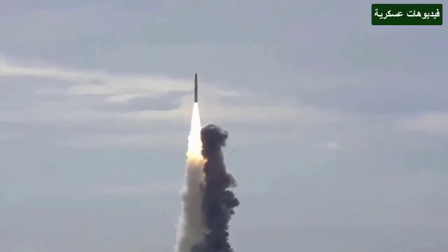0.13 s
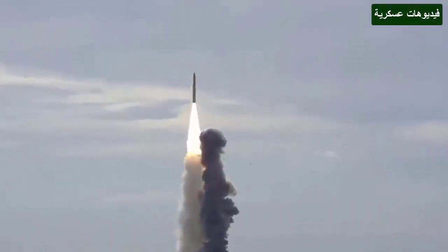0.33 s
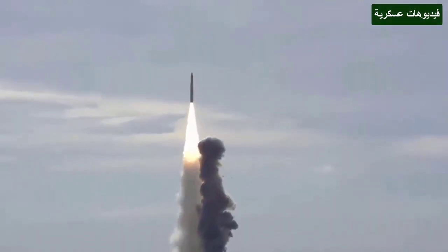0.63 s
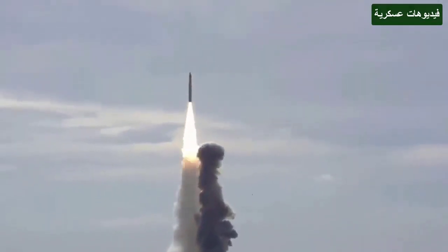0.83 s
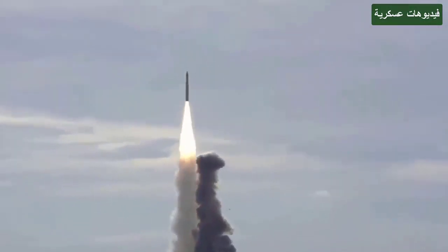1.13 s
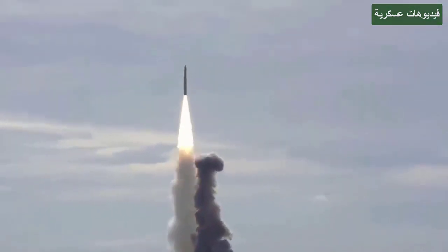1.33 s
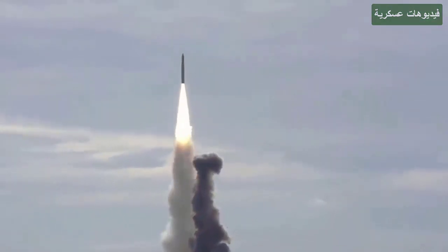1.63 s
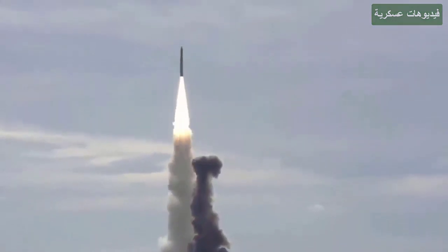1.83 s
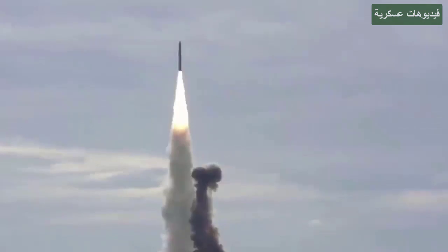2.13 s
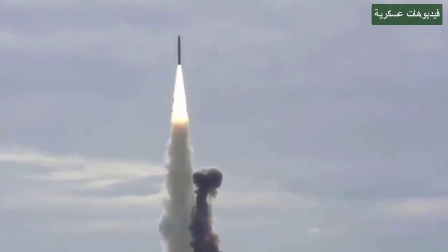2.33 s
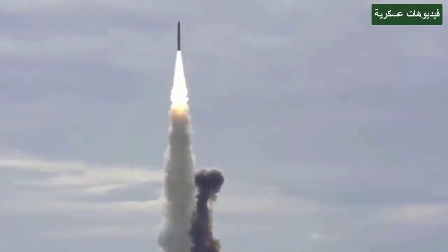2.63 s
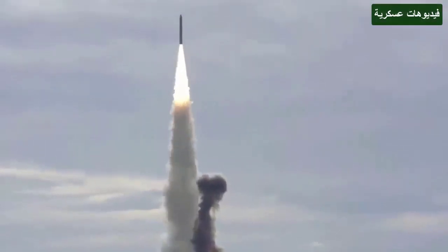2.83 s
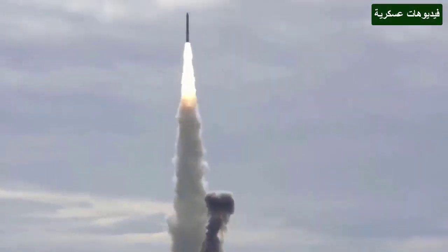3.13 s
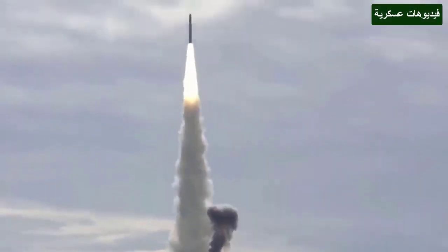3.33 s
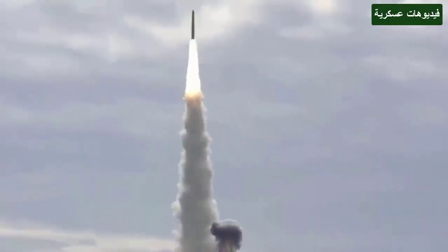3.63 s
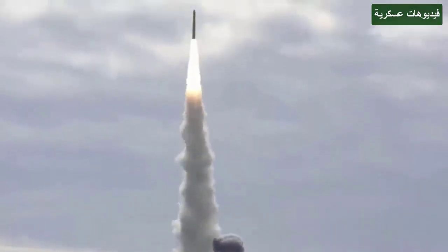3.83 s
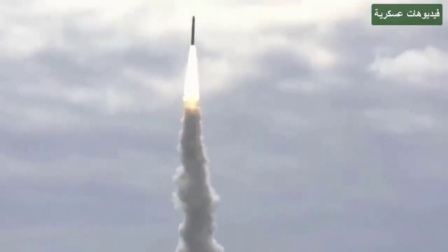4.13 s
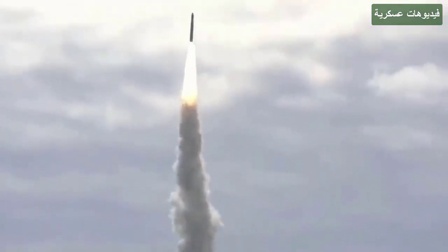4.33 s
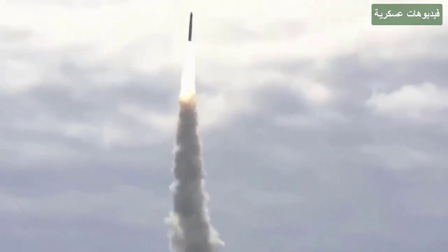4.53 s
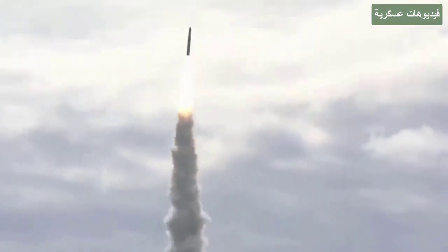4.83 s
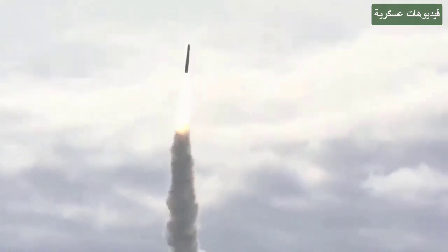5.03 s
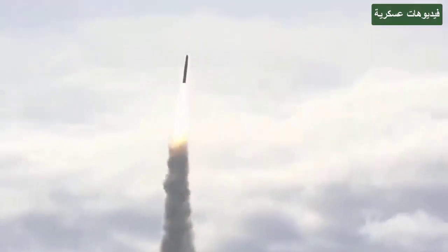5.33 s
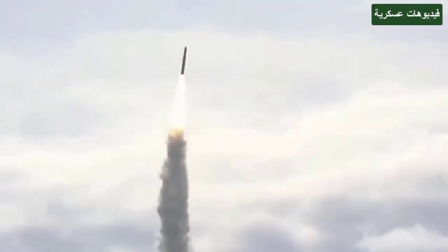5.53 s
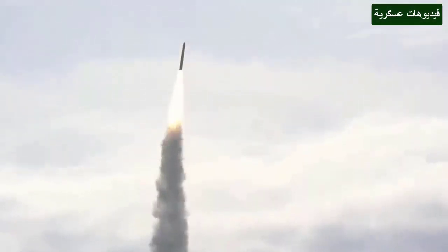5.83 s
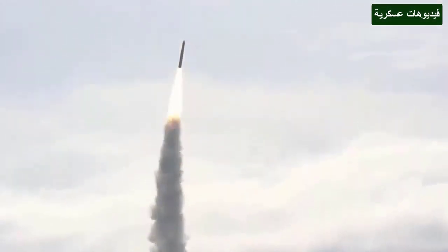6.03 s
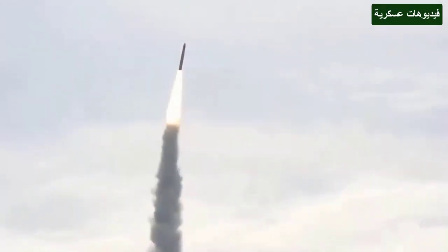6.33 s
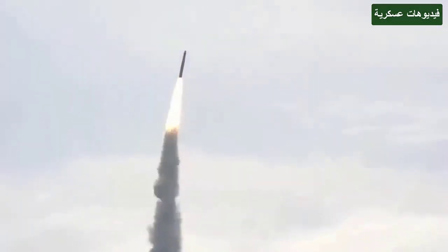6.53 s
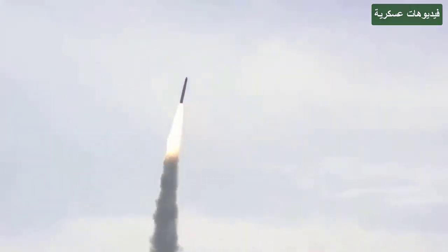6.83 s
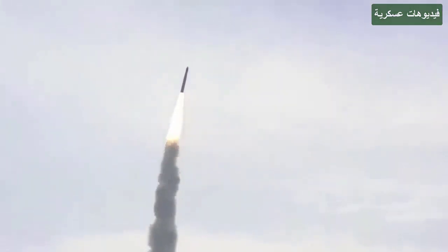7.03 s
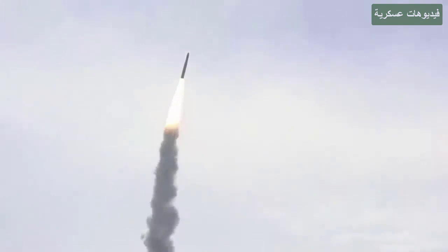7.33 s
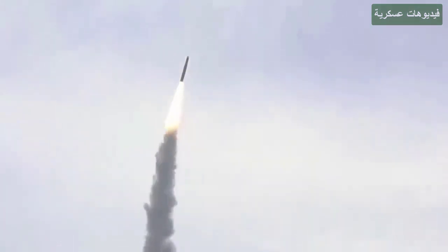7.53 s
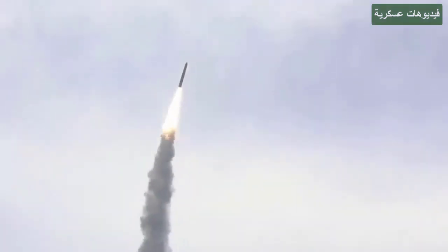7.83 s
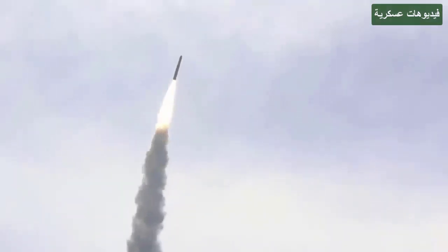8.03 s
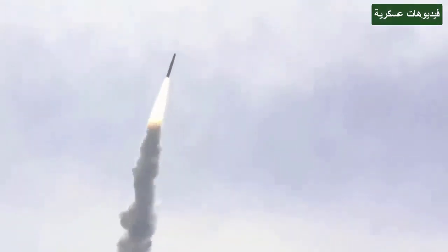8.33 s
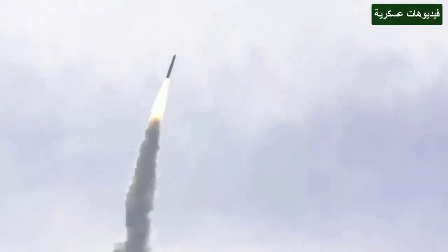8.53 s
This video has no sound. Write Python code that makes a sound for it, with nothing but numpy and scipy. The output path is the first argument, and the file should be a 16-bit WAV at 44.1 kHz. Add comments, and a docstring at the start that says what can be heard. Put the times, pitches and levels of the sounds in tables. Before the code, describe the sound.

Windy ship deck with whining machinery, a booming gas ejection, a short rasping jet burst, then a rocket motor ignites into an overloaded, crackling roar.

```python
"""Wind and whining machinery are heard on a ship's deck, then a rocket is launched: gas booms out of its tube.
A half-second jet burst follows, and then the main motor lights at once.
Its roar overloads the microphone; its crackle swells to a peak about three seconds after ignition, then eases.
Filtered noise makes wind, gas and plume; sines and narrow resonances make the notes; clicks make shocks."""
import sys
import numpy as np
from scipy import signal
from scipy.fft import rfft, irfft, next_fast_len
from scipy.io import wavfile
from scipy.ndimage import uniform_filter1d, map_coordinates

SR = 44100
rng = np.random.default_rng(int(sys.argv[2]) if len(sys.argv) > 2 else 0)


def generate_wav(sig):
    """Save sig (samples, or channels by samples) to the path in sys.argv[1] as 16-bit PCM at SR."""
    pcm = np.round(np.clip(np.atleast_2d(sig).T, -1, 1) * 32767).astype(np.int16)
    wavfile.write(sys.argv[1], SR, pcm)


N = 382347
TIME = np.arange(N) / SR  # seconds
SIDES = np.array([[1], [-1]])  # opposite signs for the left and right ear
IGNITION_S = 4.073  # the main motor lights

# In every spectrum below, level_db is relative: the filtered noise is scaled afterwards.
# spectrum of rushing gas: pitch_hz [Hz], level_db [dB per Hz]
GAS_SPECTRUM = [(120, -18.5), (220, -2), (330, 4), (520, -3), (630, -6), (780, -0.5), (1100, -7),
                (1400, -9.5), (2100, -19.5), (3000, -35), (4200, -49), (8000, -64)]
# spectrum of the rasp on the edge of the escaping gas: pitch_hz [Hz], level_db [dB per Hz]
RASP_SPECTRUM = [(900, -9.5), (1500, 0.5), (2200, -8), (2900, -12.5), (3600, -21.5), (5000, -33)]


def undb(db):
    """Turn decibels into gain."""
    return 10 ** (np.asarray(db) / 20)


def unit(x):
    """Scale a sound to an average (rms) strength of 1."""
    return x / np.sqrt(np.mean(x ** 2))


def curves(table):
    """Draw each column of a table as a curve over time, one value per sample."""
    s, *columns = np.transpose(table)
    return [np.interp(TIME, s, column) for column in columns]


def since(s):
    """Seconds since a moment, zero before it."""
    return np.maximum(TIME - s, 0)


def fade(s, decay_s):
    """Start at once and die away."""
    return (TIME > s) * np.exp(-since(s) / decay_s)


def puff(s, swell_s):
    """Swell to 1 in the swell time and die away more slowly."""
    age = since(s) / swell_s
    return age * np.exp(1 - age)


def swell(s, half_s):
    """Rise smoothly to 1 at a moment and sink the same way."""
    return np.exp(-((TIME - s) / half_s) ** 2)


def walk(rate):
    """Smooth random wander with spread near 1, taking about `rate` new values a second."""
    knots = rng.standard_normal(8192)
    return map_coordinates(knots, [TIME * rate], order=2, mode="wrap")


def colour(x, points):
    """Filter a sound through (Hz, dB) points without any sound ahead of its cause."""
    size = next_fast_len(N + SR // 2, True)
    hz, db = np.transpose(points)
    f = np.maximum(np.fft.rfftfreq(size, 1 / SR), 1)
    # beyond the first and last point the level falls 12 dB per octave, by 60 dB at most
    slopes = 40 * np.log10(np.minimum(f / hz[0], 1) * np.minimum(hz[-1] / f, 1))
    gain_db = np.interp(np.log(f), np.log(hz), db) + np.maximum(slopes, -60)
    gain = unit(undb(gain_db))
    # folding the cepstrum forward in time gives the filter its minimum phase
    cepstrum = irfft(np.log(gain), size)
    cepstrum[1:size // 2] *= 2
    cepstrum[size // 2 + 1:] = 0
    return irfft(rfft(x, size) * np.exp(rfft(cepstrum)), size)[:N]


def noise(points):
    """Turbulence with a given spectrum, rms 1."""
    return unit(colour(rng.standard_normal(N), points))


def ring(hz, width_hz):
    """A narrow resonance fed by turbulence, rms 1; its centre may move."""
    phase = 2 * np.pi * np.cumsum(hz * np.ones(N)) / SR
    return unit(walk(width_hz) * np.cos(phase) + walk(width_hz) * np.sin(phase))


def shocks(wave, per_s, spread_db):
    """Shock fronts of widely varying size, most likely on the falling flanks of a wave; rms 1."""
    flank = np.maximum(-np.gradient(uniform_filter1d(wave, size=12)), 0)
    struck = rng.random(N) < flank / flank.mean() * per_s / SR
    size = undb(spread_db * np.minimum(rng.exponential(size=N), 4))
    return -unit(struck * size / np.sqrt(per_s))


def fizzed(clicks, fizz, decay_s, points):
    """Scatter every shock into a very short fizz, whose treble differs at each ear."""
    decay = np.exp(-1 / (decay_s * SR))
    tail = np.sqrt(signal.lfilter([1 - decay], [1, -decay], clicks ** 2))
    mid = colour(clicks + fizz * tail * rng.standard_normal(N), points)
    side = colour(.55 * tail * rng.standard_normal(N), points)
    treble_only = signal.butter(2, 4300, "high", fs=SR, output="sos")
    return mid + SIDES * signal.sosfilt(treble_only, side)


def gusty_wind():
    """Turbulent air buffets the microphone: low noise with a wandering level and a few strong gusts."""
    # wind at the microphone: pitch_hz [Hz], level_db [dB per Hz]
    wind_spectrum = [(8, 2.5), (20, -0.5), (57, -4), (67, -13.5), (90, -18), (150, -22.5), (210, -28.5),
                     (400, -38), (900, -80.5)]
    # the strongest gusts: peak_s [s], level_db [dB above the steady wind]
    strong_gusts = [(1.19, 6.5), (1.36, 5), (2.05, 4), (2.42, 3)]
    steady_db, gust_half_s, buffet_db = -29, 0.071, 1.5
    gust_db = sum(db * swell(s, gust_half_s) for s, db in strong_gusts)
    buffeted = noise(wind_spectrum) * undb(buffet_db * walk(9.4))
    return unit(buffeted) * undb(steady_db + gust_db)


def engine_drone():
    """The ship's engines drone: one narrow, low resonance."""
    return undb(-47.5) * ring(146.2, width_hz=20)


def whine(hz, width_hz):
    """A steady line inside a skirt of noise; the wider the line, the rougher."""
    rough_width_hz = 48  # here line and skirt have comparable strength
    skirt = (width_hz / rough_width_hz) ** 2 * ring(hz, width_hz)
    return unit(np.sin(2 * np.pi * hz * TIME) + skirt)


def whistles():
    """Turbines whistle on thin, close lines, each drifting with its own speed."""
    # turbine whistles: pitch_hz [Hz], level_db [dB against the machinery level]
    whistle_lines = [(5295, -14.5), (5585, -14.5), (5628, -11.5), (5700, -12)]
    # upper partials they share: multiple [times the pitch], level_db [dB against the main line]
    whistle_partials = [(1.25, -9), (1.5, -13.5)]
    drift = 0.0027  # share of the pitch
    out = 0
    for hz, db in whistle_lines:
        drifting_hz = hz * (1 + drift * walk(1.6))
        phase = 2 * np.pi * np.cumsum(drifting_hz) / SR
        upper = sum(undb(upper_db) * np.sin(multiple * phase) for multiple, upper_db in whistle_partials)
        out = out + undb(db) * unit((np.sin(phase) + upper) * undb(1.6 * walk(11)))
    return out


def dip_under(loud):
    """Gain of a background that dips under a loud sound and creeps back."""
    threshold_db, depth, smooth_s = -46, 0.19, 0.058
    keep = np.exp(-1 / (smooth_s * SR))
    power = signal.lfilter([1 - keep], [1, -keep], loud ** 2)
    return (1 + power / undb(threshold_db) ** 2) ** -depth


def machinery(launch):
    """Machinery hisses as broad noise and whines on steady lines, dipping under the launch."""
    # machinery hiss: pitch_hz [Hz], level_db [dB per Hz]
    hiss_spectrum = [(90, 7), (150, 8), (210, -3), (400, -2), (900, -3.5), (1400, -7.5), (2000, -13),
                     (3500, -20.5), (6000, -24), (8800, -29.5), (10000, -38), (15000, -45.5)]
    # machinery whine: pitch_hz [Hz], width_hz [Hz], level_db [dB against the machinery level]
    whine_lines = [(915, 9.7, 3.5), (1404, 25, -1), (1755, 37, -6), (2270, 35, -11.5), (2760, 60, -13.5)]
    machinery_db, hiss_db = -58, 14  # the hiss is set against the machinery level
    lowest, *upper = [undb(db) * whine(hz, width_hz) for hz, width_hz, db in whine_lines]
    # the lowest whine fades for a while around the boom
    lull = undb(-9 * swell(1.7, half_s=0.48))
    lines = lowest * lull + sum(upper) + whistles()
    return (undb(hiss_db) * noise(hiss_spectrum) + lines) * undb(machinery_db) * dip_under(launch)


def deck(launch):
    """Wind, drone and machinery together, fading out within hundredths of a second of ignition."""
    background = gusty_wind() + engine_drone() + machinery(launch)
    return background * np.exp(-since(IGNITION_S) / 0.0078)


def gas_rush():
    """Hollow swells of rushing gas around the launch, each a resonance with a wandering pitch."""
    # swells: peak_s [s], level_db [dB], half_length_s [s], pitch_hz [Hz], width_hz [Hz]
    rush_swells = [(0.728, -48, 0.062, 578, 100), (1.327, -42, 0.19, 691, 421),
                   (1.442, -42.5, 0.067, 717, 130.7), (1.602, -30, 0.042, 617, 461.6),
                   (1.827, -45, 0.19, 640, 456.5), (1.897, -44.5, .06, 560, 48.8),
                   (3.683, -52.5, 0.46, 694, 461)]
    wander = .05  # share of the pitch
    out = np.zeros(N)
    for s, db, half_s, hz, width_hz in rush_swells:
        out += undb(db) * swell(s, half_s) * ring(hz * (1 + wander * walk(9)), width_hz)
    return out


def ejection():
    """Gas rushes from the tube, bursts out with a snap in lumpy, rasping puffs and rolls away."""
    # low body of the boom: pitch_hz [Hz], level_db [dB per Hz]
    boom_spectrum = [(20, 3.5), (60, -12.5), (85, 3.5), (115, 0.5), (200, -1), (300, -11.5), (420, -12),
                     (900, -31)]
    # the snap of the opening tube: pitch_hz [Hz], level_db [dB per Hz]
    snap_spectrum = [(400, 8), (1500, -17), (3000, 22), (5000, 10), (8000, 3), (15500, -17)]
    # puffs of gas that make up the boom: start_s [s], low_db [dB], bright_db [dB], swell_s [s]
    gas_puffs = [(1.523, -16.5, -25, 0.0046), (1.544, -17, -30.5, 0.014), (1.577, -26, -31, 0.02),
                 (1.64, -29, -42, 0.029), (1.711, -28.5, -41, 0.011)]
    rasp_db, lumps_db = -12, 1.0
    boom_s = gas_puffs[0][0]
    # the boom rolls away over the water, its bright part dying first
    low = undb(-34.5) * fade(boom_s, decay_s=1)
    bright = undb(-44.5) * fade(boom_s, decay_s=0.53)
    for s, low_db, bright_db, swell_s in gas_puffs:
        low = np.hypot(low, undb(low_db) * puff(s, swell_s))
        bright = np.hypot(bright, undb(bright_db) * puff(s, swell_s))
    rasping = noise(GAS_SPECTRUM) + undb(rasp_db) * noise(RASP_SPECTRUM)
    gas = unit(rasping * undb(lumps_db * walk(180)))
    snap = undb(-35) * fade(boom_s, decay_s=0.0026) * noise(snap_spectrum)
    # a low throb comes late in the boom
    throb_hz = 93.5
    throb = undb(-25) * swell(1.73, half_s=0.03) * np.sin(2 * np.pi * throb_hz * TIME)
    return gas_rush() + snap + throb + low * noise(boom_spectrum) + bright * gas


def jet_howl():
    """The jet's resonances howl together on a wandering note."""
    # the howl: time_s [s], pitch_hz [Hz], level_db [dB]
    howl_path = [(2.46, 337.8, -31), (2.51, 264, -35), (2.56, 329.3, -32), (2.61, 351.3, -41),
                 (2.63, 353, -27), (2.71, 309.7, -29), (2.77, 311, -31), (2.83, 386.3, -38),
                 (2.9, 291.6, -49), (2.95, 268, -35.5)]
    # upper resonances: multiple [times the note], width_hz [Hz], level_db [dB against the note]
    howl_resonances = [(1.5, 129.8, -6.5), (2.35, 90.2, -15.5)]
    howl_hz, howl_db = curves(howl_path)
    howl = ring(howl_hz, width_hz=44)
    for multiple, width_hz, db in howl_resonances:
        howl = howl + undb(db) * ring(multiple * howl_hz, width_hz)
    return undb(howl_db) * howl


def jet_burst():
    """A rasping, sputtering, howling gas jet opens hard, surges and is quickly shut off."""
    # surges as the jet opens, peaks and shuts: peak_s [s], change_db [dB], half_length_s [s]
    jet_surges = [(2.47, 2.5, 0.027), (2.57, -3.5, 0.043), (2.69, 3.5, 0.033), (2.853, 2.5, 0.029),
                  (2.956, 2.5, 0.017)]
    start_s, end_s, jet_db = 2.4605, 2.962, -30.5
    attack_s, release_s = 0.00076, 0.032
    echo_db, echo_s = -15, 0.25  # a faint echo after the release
    rasp_db, sputter_db = -18, -8
    attack = 1 - np.exp(-since(start_s) / attack_s)
    after = since(end_s)
    release = np.maximum(np.exp(-after / release_s), undb(echo_db) * np.exp(-after / echo_s))
    surge_db = sum(db * swell(s, half_s) for s, db, half_s in jet_surges)
    gas = unit(noise(GAS_SPECTRUM) + undb(rasp_db) * noise(RASP_SPECTRUM))
    sputter = unit(colour(shocks(gas, per_s=320, spread_db=5), GAS_SPECTRUM))
    jet = unit(gas + undb(sputter_db) * sputter) * undb(jet_db + surge_db)
    return (jet + jet_howl()) * attack * release


def blasts():
    """Each front is a steep pressure step that decays through zero into a weaker opposite lobe."""
    # blast fronts: start_s [s], size_db [dB, before rise and decay], first_lobe_s [s], rise_s [s]
    blast_fronts = [(1.5228, -6.5, 0.0042, 0.000082), (1.546, -13, 0.0052, 0.00017),
                    (1.556, -9, 0.0023, 0.0005), (1.5648, -12, 0.0053, 0.00057),
                    (1.5964, -18, 0.0031, 0.00018), (2.4619, -8.5, 0.00064, 0.00019),
                    (2.495, -12, 0.00058, 0.00026), (2.686, -14, 0.00071, 0.00017),
                    (2.697, -18, 0.00045, 0.00019), (2.831, -19, 0.00074, 0.0001),
                    (2.946, -12, 0.00056, .0002), (4.0727, -4.5, 0.0018, 0.00016)]
    out = np.zeros(N)
    for s, db, lobe_s, rise_s in blast_fronts:
        age = since(s)
        rise = (1 - np.exp(-age / rise_s)) ** 2
        lobes = (1 - (age / lobe_s) ** 2) * np.exp(-age / lobe_s)
        out -= undb(db) * rise * lobes
    return out


def rumble():
    """The deep rumble of lift-off thins, and slow eddies come forward as the rocket draws away."""
    # deep rumble of the plume: pitch_hz [Hz], level_db [dB per Hz]
    rumble_spectrum = [(20, -5), (45, -3), (85, 3), (110, -3), (160, -6.5)]
    # the rumble from lift-off to its level aloft: time_s [s], level_db [dB]
    rumble_path = [(4.1, -25), (5.3, -27.5), (6.0, -31.5), (6.6, -28.5), (6.9, -50), (8.67, -36.5)]
    rumble_db, = curves(rumble_path)
    # the slow eddies gain 6 dB per second, heading for -26 dB at 8.8 s
    slow_db = -26 + 6 * np.minimum(TIME - 8.8, 0)
    slow_eddies = ring(123.2, width_hz=63)
    return undb(rumble_db) * noise(rumble_spectrum) + undb(slow_db) * slow_eddies


def off_deck(x, reflection):
    """A sound with its reflection off the deck, rms 1; a growing lag makes the comb of notches sink."""
    # the reflection lags more as the rocket climbs: time_s [s], lag_s [s]
    lag_path = [(4.07, .00306), (5.2, .00323), (5.95, .0039), (6.6, .00466), (7.1, .00512), (7.55, .00577),
                (8, .007), (8.6, .0078)]
    lag_s, = curves(lag_path)
    return unit(x + reflection * np.interp(TIME - lag_s, TIME, x))


def steepened(x, lead_s):
    """Strong compressions (negative here) outrun the rest until their fronts stand upright as shocks."""
    arrival = TIME + lead_s * x
    # where parts would overtake each other, their arrivals are put back in order
    latest_so_far = np.maximum.accumulate(arrival)
    earliest_to_come = np.minimum.accumulate(arrival[::-1])[::-1]
    return np.interp(TIME, (latest_so_far + earliest_to_come) / 2, x)


def overload(x):
    """Soft saturation that the compressions reach sooner than the troughs; its edges stay rounded."""
    skew, edge_hz = 0.2, 3300
    lopsided = (1 - np.exp(-skew * x)) / skew
    flattened = np.tanh(lopsided - uniform_filter1d(lopsided, size=4000))
    flattened = signal.sosfilt(signal.butter(1, 25, "high", fs=SR, output="sos"), flattened)
    return signal.sosfilt(signal.butter(2, edge_hz, fs=SR, output="sos"), flattened)


def roar(level_db, tear_db, eddy_hz):
    """Eddies arrive directly and off the deck, steepen and press the microphone into flat-topped waves."""
    # how hard the roar drives the microphone: time_s [s], drive_db [dB]
    drive_path = [(4.07, -5), (4.6, -4), (5.3, -.5), (5.9, 3.5), (7.4, 4), (8.67, 3)]
    # large eddies of the plume: pitch_hz [Hz], level_db [dB per Hz]
    eddy_spectrum = [(30, -29.5), (85, -14), (120, -4.5), (170, 2), (250, -0.5), (370, -0.5), (470, -10),
                     (700, -31.5), (1500, -63.5)]
    # small, tearing eddies of the plume: pitch_hz [Hz], level_db [dB per Hz]
    tear_spectrum = [(250, -14.5), (520, 1), (850, -1), (1100, -9.5), (1450, -8.5), (2100, -15.5),
                     (3200, -19.5), (5000, -28.5), (9000, -44.5)]
    core_db, ripple_db = -5, -5  # strongest eddies against the others; ripple against the tearing
    drive_db, = curves(drive_path)
    # the reflection is weaker while the rocket is still low
    grazing = 1 - 0.78 * fade(IGNITION_S, 1.8)
    large_eddies = noise(eddy_spectrum) + undb(core_db) * ring(eddy_hz, width_hz=110)
    eddies = off_deck(large_eddies, 0.35 * grazing)
    tearing = off_deck(noise(tear_spectrum) * undb(1.5 * walk(200)), reflection=0.21)
    # how far a compression of strength 1 runs ahead, in seconds; it grows with the drive
    lead_s = .00006 * undb(0.19 * drive_db)
    pressure = steepened(eddies + undb(tear_db) * tearing, lead_s)
    wave = overload(undb(drive_db) * pressure)
    # gain control evens the wave out over a few cycles
    held = wave / np.sqrt(uniform_filter1d(wave ** 2, size=2600))
    # a dense rattle of dull shocks ripples the flat tops
    ripple = unit(colour(shocks(eddies, per_s=1700, spread_db=8.0), tear_spectrum))
    return (held + undb(tear_db + ripple_db) * ripple) * undb(level_db)


def crackle(wave, crackle_db):
    """Sharp shocks clump over a sizzle; the stronger the crackle, the denser and brighter they are."""
    # shock crackle of the plume: pitch_hz [Hz], level_db [dB per Hz]
    crackle_spectrum = [(400, 9), (1500, -15), (2800, 6.5), (4000, 20.5), (5200, 19), (8000, 14.5),
                        (10000, 8.5), (15500, -16)]
    # extra top-octave spit: pitch_hz [Hz], level_db [dB per Hz]
    spit_spectrum = [(3500, 5), (6000, 0), (10000, 8), (15500, 1)]
    clump_db, shocks_db, sizzle_db = 2.0, -3.5, -3
    flurry_db, flurries_per_s = 2.1, 16
    below_db = crackle_db - crackle_db.max()
    sharp = shocks(wave, 800 * undb(0.23 * below_db), spread_db=5.5)
    clicks = unit(sharp * undb(clump_db * walk(14)))
    clicks = clicks + undb(sizzle_db) * rng.standard_normal(N)
    # the whole crackle, sizzle included, comes in uneven flurries
    clicks = clicks * undb(crackle_db + shocks_db + flurry_db * walk(flurries_per_s))
    # the spit rises and falls faster than the crackle
    spit_clicks = clicks * undb(-7 + 0.7 * below_db)
    spit = fizzed(spit_clicks, fizz=1.0, decay_s=0.0026, points=spit_spectrum)
    return fizzed(clicks, fizz=1.0, decay_s=0.0013, points=crackle_spectrum) + spit


def cracks(crackle_db):
    """Large shocks snap through the roar: the sharpest ones, and strays that follow the crackle's level."""
    # the sharpest cracks: start_s [s], level_db [dB, relative to each other before the close boost]
    sharp_cracks = [(4.115, -45), (4.14, -45), (4.2055, -41), (4.2078, -38), (4.2134, -42), (4.2333, -37),
                    (4.2684, -46), (4.3332, -36), (4.358, -47), (4.397, -37), (4.512, -42), (4.6422, -31),
                    (4.7406, -39), (5.0704, -42), (5.0923, -35), (5.154, -31.5), (5.221, -38),
                    (5.4782, -39), (5.521, -30.5), (5.5697, -32), (5.6924, -46), (5.7216, -29),
                    (5.8156, -25), (5.8925, -33), (5.9928, -30), (6.0711, -24), (6.173, -30),
                    (6.1853, -23.5), (6.2556, -29), (6.2801, -29), (6.3609, -38), (6.3609, -26),
                    (6.3774, -21), (6.3804, -28), (6.4364, -26), (6.444, -31), (6.4544, -28), (6.4608, -23),
                    (6.473, -29), (6.5004, -33), (6.5138, -29), (6.556, -22), (6.5789, -27), (6.5864, -23),
                    (6.6323, -31), (6.653, -29), (6.6757, -22), (6.6927, -35), (6.717, -22), (6.7534, -18),
                    (6.8099, -31), (6.8154, -23), (6.8547, -21), (6.8804, -25), (6.887, -21), (6.9066, -25),
                    (6.9242, -24.5), (6.9394, -29), (7.0637, -28), (7.1796, -36), (7.2544, -42),
                    (7.3923, -24), (7.516, -35), (7.5887, -40), (7.5887, -37), (7.7065, -23), (7.7539, -34),
                    (7.879, -23), (7.9033, -22), (7.9354, -31), (7.9897, -18), (8.0595, -28), (8.077, -22),
                    (8.1015, -24), (8.1861, -22.5), (8.2467, -29), (8.2821, -24), (8.2894, -23.5),
                    (8.4726, -43), (8.525, -25.5), (8.5706, -33)]
    # one large shock of the plume: pitch_hz [Hz], level_db [dB per Hz]
    shock_spectrum = [(600, 31), (2000, 9.5), (3500, 13.5), (5000, 8.5), (8000, 1.5), (15500, -16)]
    crack_db, close_db, close_s = 15, 7, 0.54
    stray_db, stray_per_s, follow = -23, 14, 0.54
    size_db = stray_db + follow * (crackle_db - crackle_db.max()) + 1.6 * rng.standard_normal(N)
    clicks = undb(size_db) * (rng.random(N) < stray_per_s / SR)
    # the first cracks, from close above the deck, hit harder
    for s, db in sharp_cracks:
        close_boost_db = close_db * np.exp(-(s - IGNITION_S) / close_s)
        clicks[int(s * SR)] += undb(db + crack_db + close_boost_db)
    return fizzed(-clicks, fizz=.5, decay_s=.0009, points=shock_spectrum)


def motor():
    """The main motor lights in milliseconds; its crackle peaks about three seconds later, then eases."""
    # the climb: time_s [s], roar_db [dB], tearing_db [dB against the large eddies], crackle_db [dB]
    climb_path = [(4.15, -19.5, -7, -76), (4.38, -19.5, -11.5, -72), (5.35, -18.5, -15, -70.5),
                  (5.95, -17.7, -12.5, -52.5), (6.3, -17.5, -13.5, -56.5), (6.4, -18, -8.5, -50.5),
                  (6.95, -17.5, -9.5, -50), (7.45, -17.5, -9.5, -53), (8.05, -18.5, -12.5, -53.5),
                  (8.36, -20.5, -12, -56), (8.67, -19.5, -11.5, -59.5)]
    # pitch of the strongest eddies: time_s [s], pitch_hz [Hz]
    eddy_path = [(4.3, 255), (5.1, 225), (6.1, 181.8), (6.55, 225.8), (7.1, 211.7), (7.6, 187.6),
                 (8.1, 199.5), (8.5, 250)]
    young_dull_db, build_s, attack_s = -18, 0.029, 0.001
    level_db, tear_db, crackle_db = curves(climb_path)
    eddy_hz, = curves(eddy_path)
    age = since(IGNITION_S)
    # the small eddies take a moment longer to build up
    young_db = young_dull_db * np.exp(-age / build_s)
    # the roar sags once, briefly
    sag_db = -4.5 * swell(6.865, half_s=0.025)
    wave = roar(level_db + sag_db, tear_db + young_db, eddy_hz)
    plume = wave + rumble() + crackle(wave, crackle_db + young_db) + cracks(crackle_db + young_db)
    return plume * (1 - np.exp(-age / attack_s))


def scene():
    """Deck, launch, blast fronts and motor together."""
    launch = ejection() + jet_burst()
    return deck(launch) + launch + blasts() + motor()


def record(dry):
    """The recorder rounds the highest peaks and cuts the top of the treble."""
    ceiling, top_hz = .36, 15800
    rounded = dry / (1 + (dry / ceiling) ** 8) ** (1 / 8)
    return signal.sosfilt(signal.ellip(10, .2, 80, top_hz, fs=SR, output="sos"), rounded)


dry = scene()
out = record(dry)
generate_wav(out)
```